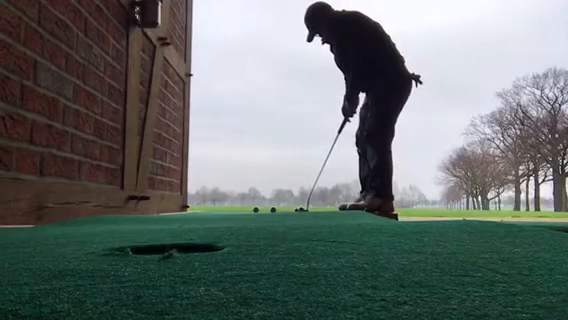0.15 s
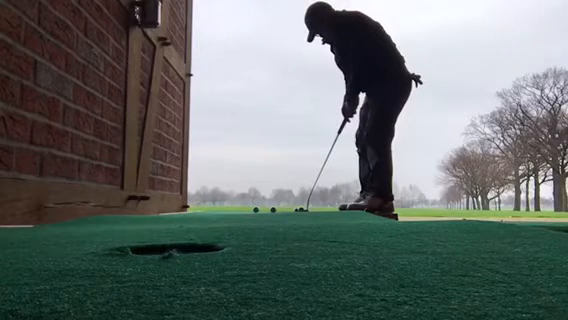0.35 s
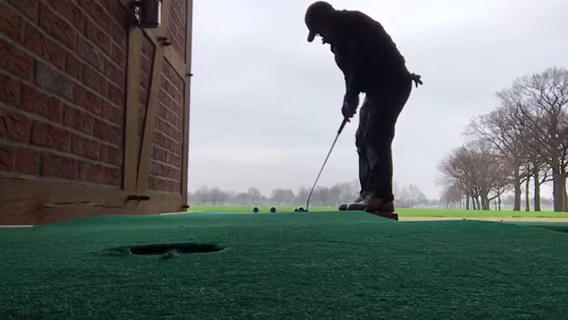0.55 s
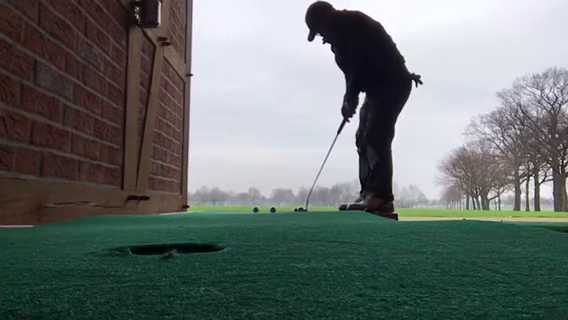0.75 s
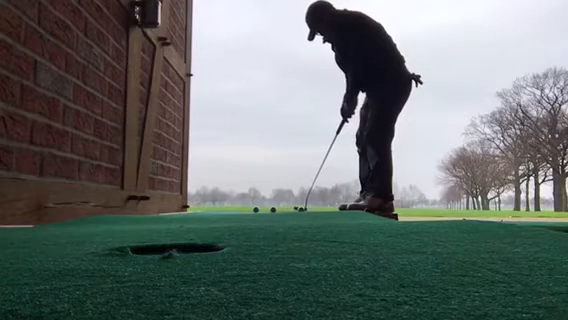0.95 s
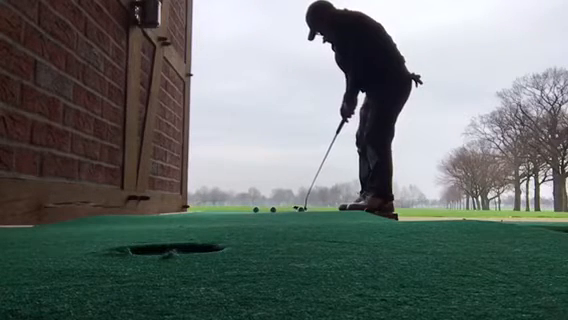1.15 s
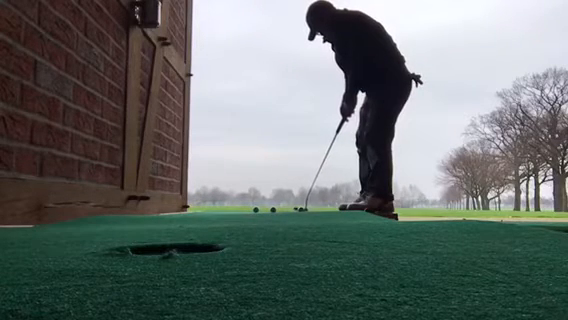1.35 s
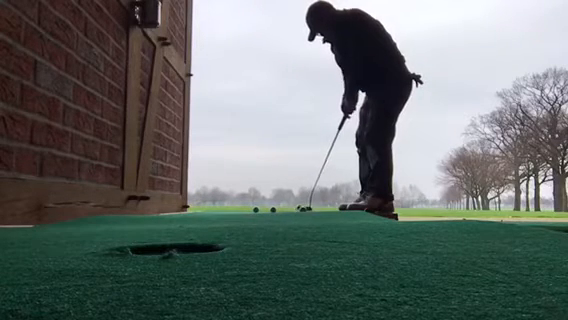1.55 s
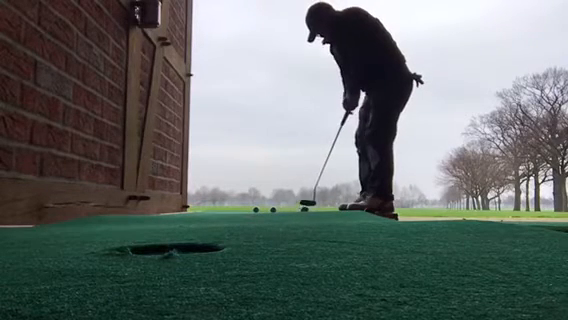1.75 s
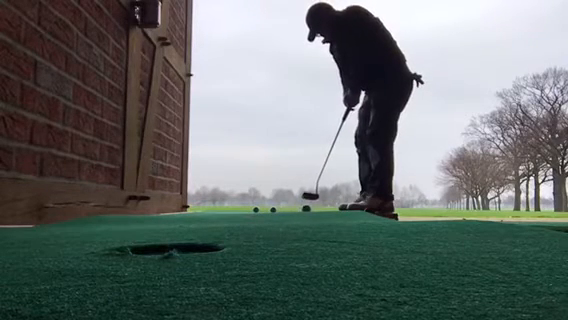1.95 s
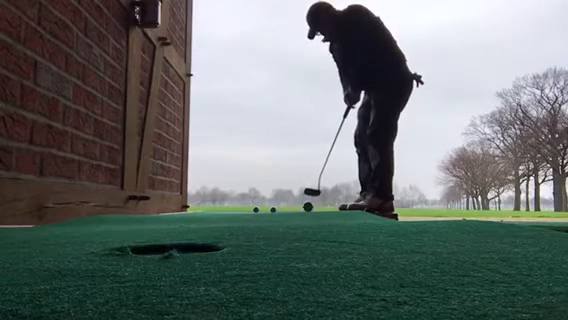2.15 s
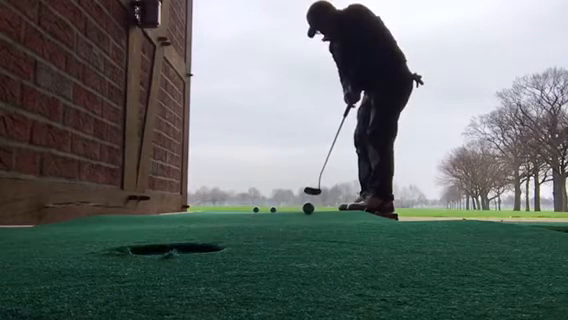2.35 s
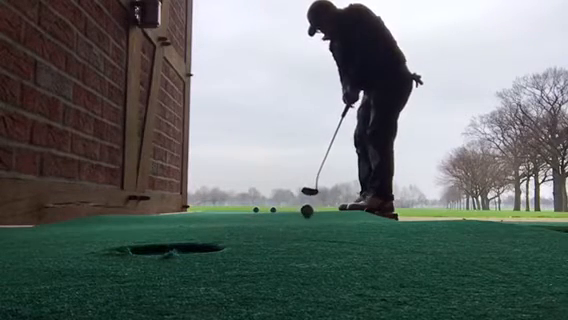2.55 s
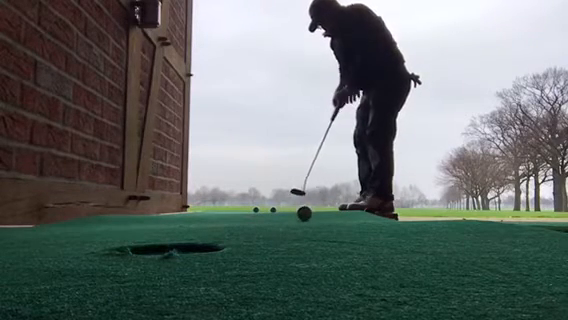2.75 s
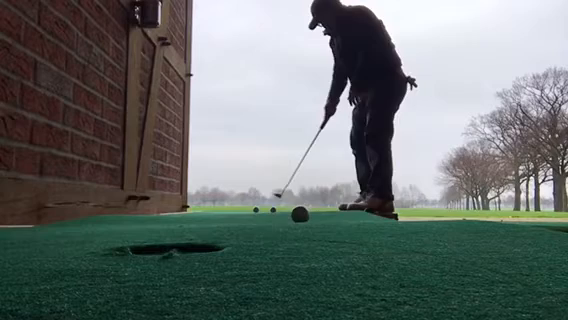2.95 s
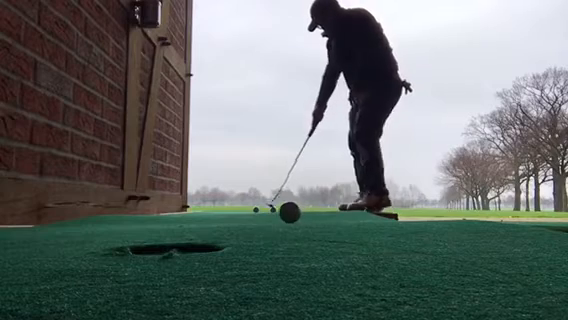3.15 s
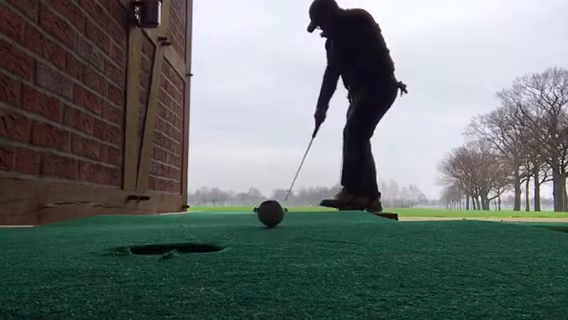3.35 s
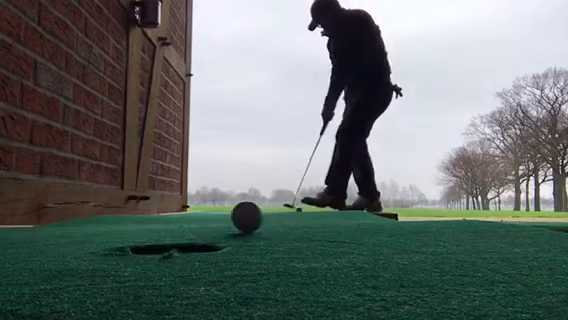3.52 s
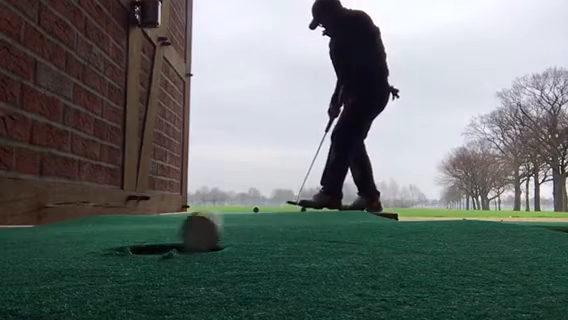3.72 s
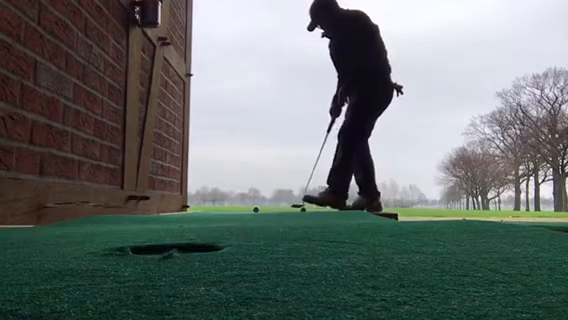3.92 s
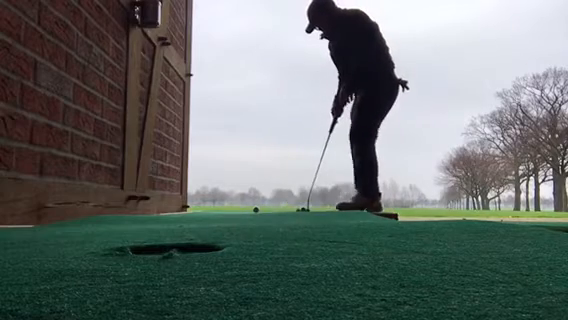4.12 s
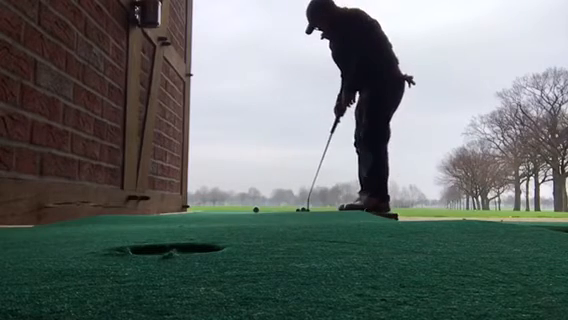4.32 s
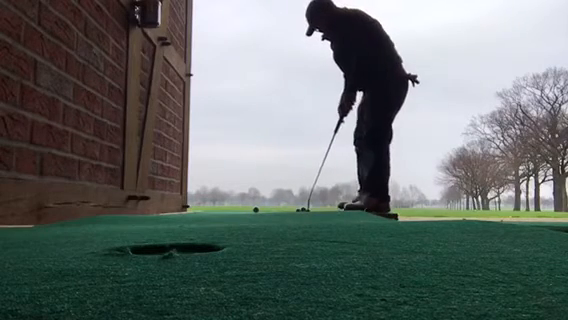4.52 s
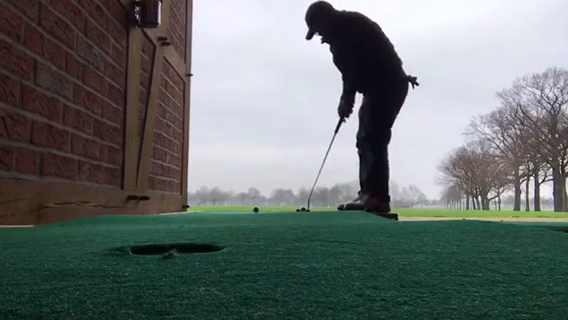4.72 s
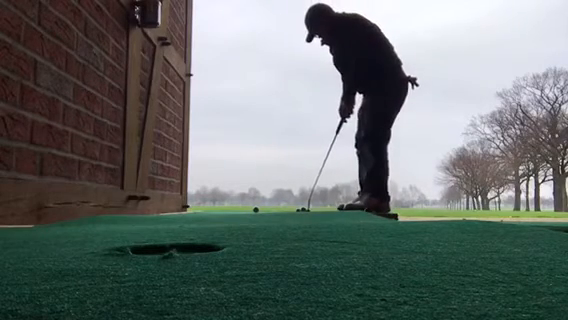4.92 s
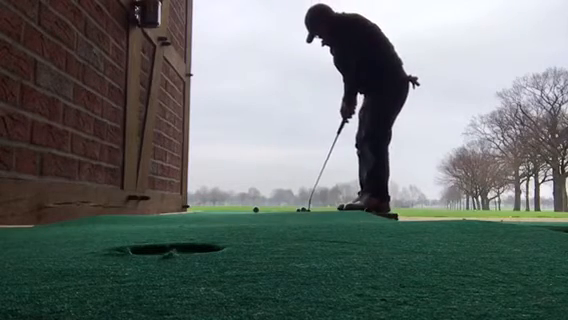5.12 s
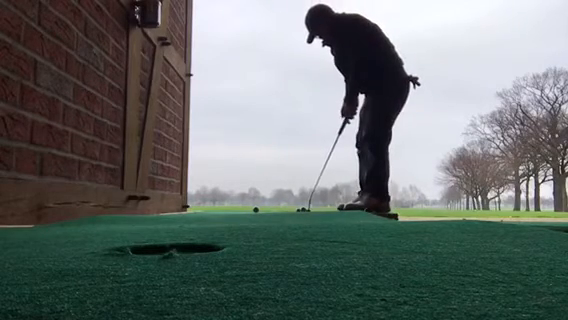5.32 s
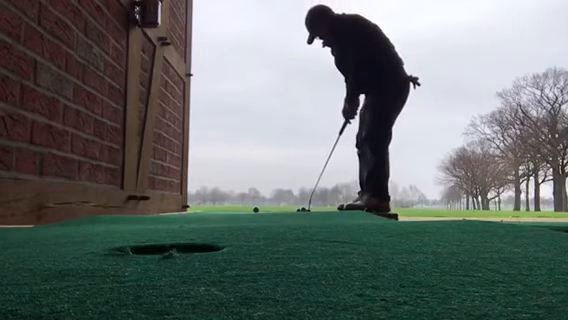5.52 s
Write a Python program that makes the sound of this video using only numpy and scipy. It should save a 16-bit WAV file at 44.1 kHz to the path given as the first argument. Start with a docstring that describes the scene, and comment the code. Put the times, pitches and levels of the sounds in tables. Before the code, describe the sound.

Quiet outdoor hum, one short putter tock, faint footsteps, then a loud hollow plastic clatter as a golf ball bounces and rolls in the hole.

```python
"""On a turf-covered wooden deck beside a brick wall, a putter taps a golf ball and shoes shift.
The ball drops into a plastic cup close by, bounces, rattles round and settles: each blow rings damped
modes of shell, cup and hollow deck, and a rough rolling force shakes the same modes between blows.
Far traffic, filtered noise with a swelling engine note, runs under it all with a faint microphone hiss.
A faint soft note, perhaps a dove, sounds early and twice more later as wavering near-pure tones."""
import sys
import numpy as np
from scipy import signal
from scipy.fft import rfft, irfft, next_fast_len
from scipy.io import wavfile
from scipy.ndimage import uniform_filter1d, map_coordinates

SR = 44100
rng = np.random.default_rng(int(sys.argv[2]) if len(sys.argv) > 2 else 0)


def inscribe(sig):
    """Save sig as 16-bit PCM at rate SR to the path in sys.argv[1].

    A 1-D sig is mono; a 2-D sig holds one channel per row.
    Samples are clipped to [-1, 1] before scaling.
    """
    pcm = np.round(np.clip(np.atleast_2d(sig).T, -1, 1) * 32767)
    wavfile.write(sys.argv[1], SR, pcm.astype(np.int16))


N = 245637  # samples

# Spectra list hz, density_db (relative, per Hz); their overall level is set where they are used.
# Mode tables list hz, level_db (relative within the table), t60_s (time to fall 60 dB).

# far traffic: time_s, hum_db, rush_db (mean band levels)
TRAFFIC_LEVELS = [(0, -63, -73.5), (1.45, -60.5, -73), (1.74, -58, -68.5), (2.5, -57.5, -73),
                  (2.83, -57, -70.5), (3.8, -57.5, -70), (5.57, -61.5, -73)]
# spectrum of the low traffic hum: hz, density_db
HUM_SPECTRUM = [(12, -59), (20, -26), (24, -14), (30, -9), (49, -1.5), (65, 4), (86, -6.5), (121, -5),
                (160, -12.5), (210, -46), (350, -120)]
# spectrum of the far traffic rush: hz, density_db
RUSH_SPECTRUM = [(50, -57), (85, -6.5), (125, -6), (162, -14), (263, -11.5), (368, -19.5), (517, -23),
                 (838, -23.5), (1120, -24.5), (1230, -27.5), (1820, -32.5), (4000, -41.5), (5200, -65.5),
                 (8800, -120)]
# spectrum of the steady faint hiss of the microphone itself: hz, density_db
MICROPHONE_HISS_SPECTRUM = [(1470, -28.5), (2500, -9), (4380, 1), (5020, -2.5), (5990, 0.5), (8020, -6),
                            (10500, -9), (11400, -6), (15600, -11)]
# engine note swelling: start_s, length_s, pitch_hz, rms_db (at the crest, before flutter)
ENGINE_NOTES = [(.1, 1, 58.9, -49.5), (1.1, 0.24, 61.2, -52.5), (2.62, 0.32, 54.47, -51.5)]
# coos: start_s, length_s, pitch_hz, rms_db (at the crest, before flutter)
COO_NOTES = [(.44, .14, 519, -78), (2.59, 0.3, 520, -76), (2.93, .2, 533, -78)]

# putter against ball: start_s, peak_db (before the turf dulls the direct path)
PUTT_BLOW = (1.533, -20)
# spectrum of the putter's tock: hz, density_db
TOCK_SPECTRUM = [(150, -38), (250, -24), (287, -16), (413, -8.5), (648, -8), (869, 3.5), (1090, -1.5),
                 (1740, -6.5), (2250, -26.5), (3070, -23.5), (3470, -31), (3850, -18.5), (4820, -34),
                 (6360, -28), (15600, -42)]
# reflections from nearby walls: delay_s, gain_db
WALL_SLAPS = [(.0135, -15), (.034, -26), (.052, -16)]
# decay of the yard: hz, t60_s
YARD_DECAY = [(200, 0.43), (800, 0.37), (2000, 0.39), (5000, 0.85), (12000, 0.65)]

# a sole drags over the turf: start_s, rise_s, hold_s, fall_db_per_s, level_db
SCUFF_STROKES = [(2.619, .09, 0.14, 99, -72.5), (2.896, 0.063, .68, 59, -82),
                 (3.176, 0.078, .04, 89.5, -82.5), (3.653, 0.034, 0.015, 75.5, -77.5)]
# spectrum of brushed turf: hz, density_db
TURF_SPECTRUM = [(350, -36), (600, -5.5), (697, -5), (1040, -1), (1140, -11), (1520, -4), (1970, -15.5),
                 (4220, -10), (5040, -16.5), (6100, -13.5), (15600, -32)]
# shoes on the deck: start_s, boom_peak_db, click_peak_db, pitch_hz (favoured by the deck)
FOOTSTEPS = [(3.293, -25.5, -48.5, 143), (3.701, -35, -39, 158), (3.77, -42, -64, 124.5)]
# modes of the shoe's sole: hz, level_db, t60_s
SOLE_MODES = [(435, 1.5, 0.018), (778, 3.0, 0.011), (962, -1.5, 0.023), (1200, -15.5, .02)]

# modes of the wooden deck: hz, level_db, t60_s
DECK_MODES = [(108, -13, 0.27), (126.2, -2, 0.21), (143.5, -12.5, 0.14), (179.1, 1, 0.2), (230.2, 1, 0.11),
              (278.2, 2.5, 0.075), (368, -14, 0.11)]
# modes of the plastic cup: hz, level_db, t60_s
CUP_MODES = [(393.4, -1.5, 0.1), (445.8, 1.5, 0.1), (540.7, 7, 0.042), (584.4, 5, 0.07), (622.2, 2, 0.08),
             (700.5, 0, 0.069), (761, 0, 0.057), (841, 1, 0.074), (896.7, -3, 0.08), (968, -1, 0.039),
             (1045, -19, 0.05), (1158, 4, 0.017), (1410, -19, 0.057)]
# modes of the ball's hard shell: hz, level_db, t60_s
SHELL_MODES = [(1627, -5.5, 0.047), (1758, -5.5, 0.037), (1894, -9.5, 0.027), (2180, 0.5, 0.035),
               (2368, 1, 0.025), (2490, 6.5, 0.028), (2552, -11, 0.028), (2990, -6, 0.03),
               (3474, -8.5, 0.03), (3440, -11, 0.013), (4350, -24, 0.022)]
# the ball rolls round the cup between bounces: time_s, deck_db, cup_db
ROLLING_LEVELS = [(3.885, -60.5, -60), (3.905, -39.5, -28.5), (3.99, -32, -39), (4.11, -40, -43),
                  (4.3, -27, -30.5), (4.5, -30, -49), (4.8, -32.5, -39), (4.96, -35, -47), (5.03, -37, -54),
                  (5.2, -50, -61), (5.32, -50.5, -80), (5.5, -84, -100)]
# shell chatter from tiny skips: start_s, rise_s, hold_s, fall_db_per_s, level_db
CHATTER_SWELL = (4, 0.16, 0.9, 111, -66)
# sliding hiss: start_s, rise_s, hold_s, fall_db_per_s, level_db
SLIDE_SWELL = (4, 0.04, 0.92, 251, -75.5)
# spectrum of dimples sliding on plastic: hz, density_db
SLIDE_SPECTRUM = [(880, -29), (1500, 0.5), (1700, -2.5), (2160, -8.5), (2780, -18.5), (4040, -15),
                  (4770, -21), (6100, -18.5), (10400, -30.5), (15600, -31)]

# ball against cup: start_s, knock_peak_db (cup), tick_peak_db (shell)
BALL_BLOWS = [(3.9045, -17, -46), (3.909, -3.5, -14.5), (3.9153, -12.5, -23.5), (3.9251, -10, -31),
              (3.9435, -15.5, -39), (3.954, -22.5, -39.5), (3.9732, -12.5, -27), (4.0585, -17, -33.5),
              (4.0834, -9.5, -22), (4.116, -10.5, -25.5), (4.1403, -18, -30), (4.1527, -17.5, -25),
              (4.1638, -14, -45), (4.2348, -10.5, -22), (4.2935, -7.5, -15.5), (4.342, -21.5, -30),
              (4.383, -17, -31), (4.4183, -16.5, -27.5), (4.4567, -17, -19.5), (4.503, -7, -22.5),
              (4.5649, -16.5, -26), (4.5927, -28, -42.5), (4.619, -31, -44.5), (4.6356, -39, -41),
              (4.6644, -29, -39), (4.6924, -33, -30), (4.7114, -23.5, -39.5), (4.7233, -26.5, -36),
              (4.749, -28, -36), (4.7617, -43.5, -43), (4.806, -27.5, -38.5), (4.8256, -39.5, -43),
              (4.8333, -28.5, -37.5), (4.8508, -21.5, -34), (4.8738, -28.5, -32.5), (4.8992, -24.5, -41.5),
              (4.9321, -21, -37.5), (4.9476, -20.5, -33), (4.9736, -33, -49.5), (5.0176, -41, -48.5),
              (5.0337, -35.5, -48), (5.0402, -21.5, -33.5), (5.1024, -37, -49), (5.1105, -23.5, -33),
              (5.1479, -31, -41.5), (5.1649, -32.5, -45), (5.1863, -37.5, -53.5)]
# hard contact of ball and plastic: hz, density_db
CRACK_SPECTRUM = [(1760, -25.5), (3000, -11), (4510, -10.5), (4930, -28.5), (6110, -18.5), (7780, -29.5),
                  (10400, -38), (14900, -43), (15600, -41.5)]
# decay of the hollow inside the cup: hz, t60_s
HOLLOW_DECAY = [(150, 0.47), (500, 0.44), (1200, 0.42), (2500, 0.035), (6000, 0.51), (12000, 0.19)]

DROP_S = 3.9  # reference time for the softening of blows
# hard early blows reach the cup's upper modes: dB per octave per dB of knock, and per s
BRIGHTENS, CUP_DULLS = 0.13, 3.9
# deck boom: offset dB, dB per dB of knock, random spread dB
BOOM_DB, BOOM_FOLLOWS, BOOM_SCATTER_DB = -6, 0.52, 2
# crack: offset dB, dB per dB of tick, dB lost per s as the ball slows and contacts soften
CRACK_DB, CRACK_FOLLOWS, CRACK_DULLS_DB_PER_S = -26, 0.45, 12.5
TOP_HZ = 15770  # upper band limit


def amp(db):
    """Decibels are logarithmic: 20 dB is a tenfold amplitude."""
    return 10 ** (np.asarray(db) / 20)


def unit(x):
    """Normalisation to rms 1."""
    return x / np.sqrt(np.mean(x ** 2) + 1e-20)


def along(points, hz):
    """Interpolation of (hz, value) points on a logarithmic frequency axis."""
    point_hz, value = np.transpose(points)
    return np.interp(np.log(hz + 1), np.log(point_hz + 1), value)


def curves(rows, outside=None):
    """Linear interpolation in time: one value per sample for each column after the time."""
    times, *columns = np.transpose(rows)
    t = np.arange(N) / SR
    return [np.interp(t, times, column, outside, outside) for column in columns]


def wobble(rate):
    """Slow fluctuation: a smooth random curve through `rate` knots a second."""
    knots = rng.standard_normal(int(N * rate / SR) + 4)
    return map_coordinates(knots, [np.arange(N) * rate / SR])


def filtered(x, response):
    """Linear filtering: the spectrum of x times a complex response of frequency."""
    m = next_fast_len(len(x) + SR // 2)
    return irfft(rfft(x, m) * response(np.fft.rfftfreq(m, 1 / SR)), m)[:len(x)]


def noise(spectrum, lo_hz=0, hi_hz=SR):
    """Coloured noise by spectral shaping, scaled so that its band lo-hi has rms 1."""
    x = filtered(rng.standard_normal(N), lambda hz: amp(along(spectrum, hz)))
    band = filtered(x, lambda hz: (hz > lo_hz) & (hz < hi_hz))
    return x / np.std(band)


def swell(start, rise, hold, fall_db, db):
    """Envelope: a gain that rises, holds and dies away exponentially."""
    t = np.arange(N) / SR - start
    decay = amp(db - fall_db * np.maximum(t - rise - hold, 0))
    return np.clip(t / rise, 0, 1) ** 2 * decay


def tones(notes, waver, flutter_db):
    """Near-pure tones: arched sines whose pitch and level waver slightly."""
    out, t = np.zeros(N), np.arange(N) / SR
    wavering_time = np.cumsum(1 + waver * wobble(10)) / SR
    for s, length, hz, rms_db in notes:
        arch = np.sin(np.pi * np.clip((t - s) / length, 0, 1)) ** 0.56
        out += np.sqrt(2) * amp(rms_db) * np.abs(arch) * np.sin(2 * np.pi * hz * wavering_time)
    return out * amp(flutter_db * wobble(14))


def ring(modes, scatter_db, attack, detune=0):
    """Modal impact, peak 1: each blow lands elsewhere, so mode strengths, signs and pitches vary."""
    hz, db, t60 = np.transpose(modes)[:, :, None]
    hz = hz * (1 + detune * rng.standard_normal(hz.shape))
    t = np.arange(SR // 2) / SR
    sign = np.sign(rng.random(hz.shape) - .2)  # most modes start in step
    strength = amp(db + scatter_db * rng.standard_normal(hz.shape)) * sign
    x = np.sum(strength * amp(-60 * t / t60) * np.sin(2 * np.pi * hz * t), 0)
    x = x * (1 - np.exp(-t / attack)) ** 2
    return x / np.abs(x).max()


def shaken(modes, drive):
    """Forced resonance: modes driven without pause by a rough force, rms 1."""
    def response(f):
        total = 0
        for k, (hz, db, t60) in enumerate(modes):
            width = np.log(1000) / (np.pi * t60)  # Hz
            resonance = 1j * f * hz / (hz * hz - f * f + 1j * f * width)
            total = total + (-1) ** k * amp(db) * resonance  # neighbours alternate in sign
        return total
    return unit(filtered(drive, response))


def struck(spectrum, force):
    """Minimum phase: a force through a causal filter with this spectrum, peak 1."""
    m = 2 * len(force)
    magnitude = amp(along(spectrum, np.fft.rfftfreq(m, 1 / SR)))
    cepstrum = irfft(np.log(magnitude + 1e-6), m)
    # folding the cepstrum onto positive time makes the filter causal
    cepstrum[1:m // 2] *= 2
    cepstrum[m // 2 + 1:] = 0
    x = irfft(rfft(force, m) * np.exp(rfft(cepstrum)), m)[:len(force)]
    return x / np.abs(x).max()


def echo(x, space, delay):
    """Diffuse reverberation: a fresh noise tail in which each frequency dies at its own speed."""
    hz, t, bins = signal.stft(rng.standard_normal(SR // 2), SR, nperseg=256)
    decay = amp(-60 * t / along(space, hz)[:, None])
    tail = signal.istft(bins * decay, SR, nperseg=256)[1]
    delayed = np.pad(x, (round(delay * SR), 0))
    return signal.fftconvolve(delayed, tail / np.linalg.norm(tail))


def add(track, s, sound):
    """Superposition: mixes a sound into the track from time s on."""
    start = round(s * SR)
    track[start:start + len(sound)] += sound[:N - start]


def traffic():
    """Band-shaped noise: a wavering hum with an engine note, a smooth far rush and faint microphone hiss."""
    hum_db, rush_db = curves(TRAFFIC_LEVELS)
    hum = amp(hum_db + 0.2 * wobble(3.9)) * noise(HUM_SPECTRUM, 35, 85)
    engine = tones(ENGINE_NOTES, waver=0.0042, flutter_db=2.0)
    rush = amp(rush_db + .6 * wobble(3)) * noise(RUSH_SPECTRUM, 300, 1500)
    microphone_hiss = amp(-83) * noise(MICROPHONE_HISS_SPECTRUM)
    return hum + engine + rush + microphone_hiss


def dove():
    """Near-pure tones: soft coos that swell, fade and waver."""
    return tones(COO_NOTES, waver=0.0119, flutter_db=3)


def putt():
    """Impulse and reflection: a tock dulled over the turf, brighter wall slaps, then the yard."""
    out, t = np.zeros(N), np.arange(SR // 10) / SR
    s, peak_db = PUTT_BLOW
    contact = np.exp(-((t - .0006) / .00003) ** 2)
    tock = amp(peak_db) * struck(TOCK_SPECTRUM, contact)
    add(out, s, filtered(tock, lambda hz: 1 / (1 + 1j * hz / 2100) ** 2))  # direct path over the turf
    for delay, slap_db in WALL_SLAPS:
        add(out, s + delay, amp(slap_db) * tock)
    deck = ring(DECK_MODES[1:5], scatter_db=0.5, attack=0.031)
    add(out, s, amp(peak_db - 29.5) * deck)  # the deck answers faintly
    add(out, s, amp(-4.0) * echo(tock, YARD_DECAY, delay=0.0037))
    return out


def scuff():
    """Friction noise: turf fibres brush under the sole in uneven strokes."""
    strokes = sum(swell(*stroke) for stroke in SCUFF_STROKES)
    return strokes * amp(wobble(40)) * noise(TURF_SPECTRUM, 2000, 10000)


def steps():
    """Selective excitation: a soft sole far from the cup rings deck modes near one pitch, lightly damped."""
    out = np.zeros(N)
    for s, boom_db, click_db, pitch_hz in FOOTSTEPS:
        # modes weaken by 45 dB per octave away from the favoured pitch and ring longer than by the cup
        near_modes = [(hz, -45 * abs(np.log2(hz / pitch_hz)), 2.05 * t60) for hz, _, t60 in DECK_MODES]
        click = ring(SOLE_MODES, scatter_db=1.5, attack=0.00072)
        boom = ring(near_modes, scatter_db=0.5, attack=0.0033)
        add(out, s, amp(boom_db) * boom + amp(click_db) * click)
        add(out, s, amp(click_db - 2) * echo(click, YARD_DECAY, delay=0.0063))
    return out


def rolling():
    """Forced vibration: drumming dimples shake deck and cup; tiny skips chatter on the shell over a hiss."""
    deck_gain, cup_gain = (uniform_filter1d(amp(db), size=200)
                           for db in curves(ROLLING_LEVELS, outside=-120))
    lumpy = rng.standard_normal(N) * amp(7.4 * wobble(60))
    force = filtered(lumpy, lambda hz: 1 / (1 + (hz / 850) ** 3.1))
    skips = (rng.random(N) < 130 / SR) * rng.standard_normal(N)  # about 130 a second
    hiss = amp(1.5 * wobble(70)) * noise(SLIDE_SPECTRUM, 4500, 12000)
    drumming = deck_gain * shaken(DECK_MODES, force) + cup_gain * shaken(CUP_MODES, force)
    chatter = swell(*CHATTER_SWELL) * shaken(SHELL_MODES, skips)
    return drumming + chatter + swell(*SLIDE_SWELL) * hiss


def bounces():
    """Modal impact: each contact cracks, ticks the shell, knocks the cup and booms the deck, and the hollow cup
    echoes it."""
    out, t = np.zeros(N), np.arange(SR // 2) / SR
    for s, knock_db, tick_db in BALL_BLOWS:
        softness = amp(-.25 * (tick_db + 26.0))  # a weak blow stays in contact longer
        crack_db = CRACK_DB + CRACK_FOLLOWS * tick_db - CRACK_DULLS_DB_PER_S * (s - DROP_S)
        boom_db = BOOM_DB + BOOM_FOLLOWS * knock_db + BOOM_SCATTER_DB * rng.standard_normal()
        tilt = BRIGHTENS * (knock_db + 21.0) - CUP_DULLS * (s - DROP_S)  # dB per octave about 600 Hz
        cup_modes = [(hz, db + tilt * np.log2(hz / 600), t60) for hz, db, t60 in CUP_MODES]

        burst = amp(-60 * t / 0.022) * (1 - np.exp(-t / (.0008 * softness))) * rng.standard_normal(len(t))
        hit = amp(crack_db) * struck(CRACK_SPECTRUM, burst)
        hit += amp(tick_db) * ring(SHELL_MODES, scatter_db=3.0, attack=0.00014 * softness, detune=.022)
        hit += amp(knock_db) * ring(cup_modes, scatter_db=4.5, attack=0.00078, detune=.025)
        hit += amp(boom_db) * ring(DECK_MODES, scatter_db=2.0, attack=0.00067, detune=0.009)
        add(out, s, hit)
        add(out, s, amp(-13.5) * echo(hit, HOLLOW_DECAY, delay=.005))
    return out


def scene():
    """High-pass filtering: keeps the near sounds free of deep bass below about 85 Hz."""
    near = bounces() + rolling() + steps() + putt()
    highpass = signal.butter(N=3, Wn=85, btype="high", fs=SR, output="sos")
    near = signal.sosfilt(highpass, near)
    return (near + scuff() + dove() + traffic())[None]


def record(dry):
    """Band limitation: an ideal low-pass keeps nothing above TOP_HZ."""
    return filtered(dry[0], lambda hz: hz < TOP_HZ)[None]


dry = scene()
out = record(dry)
inscribe(out)
```